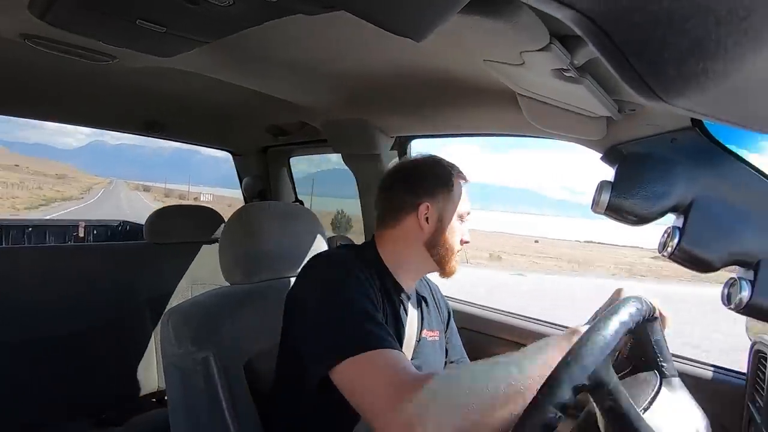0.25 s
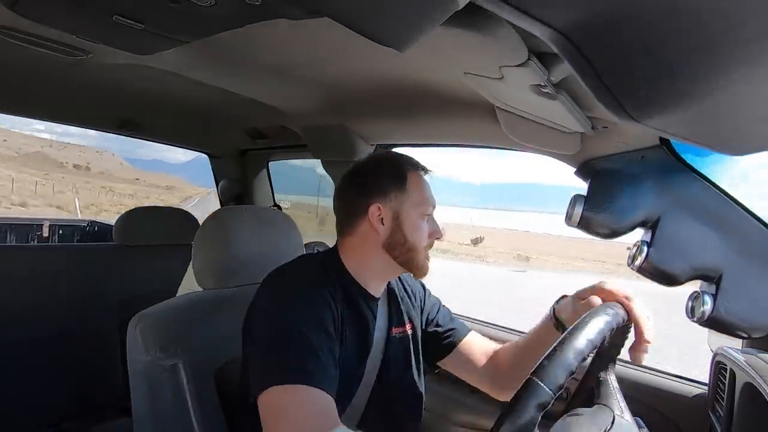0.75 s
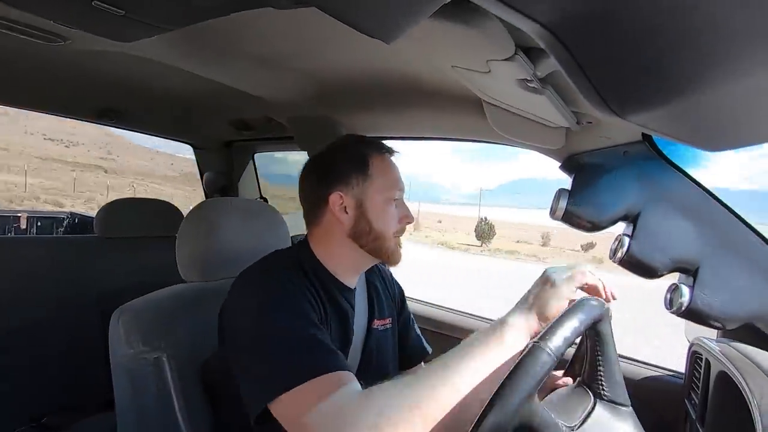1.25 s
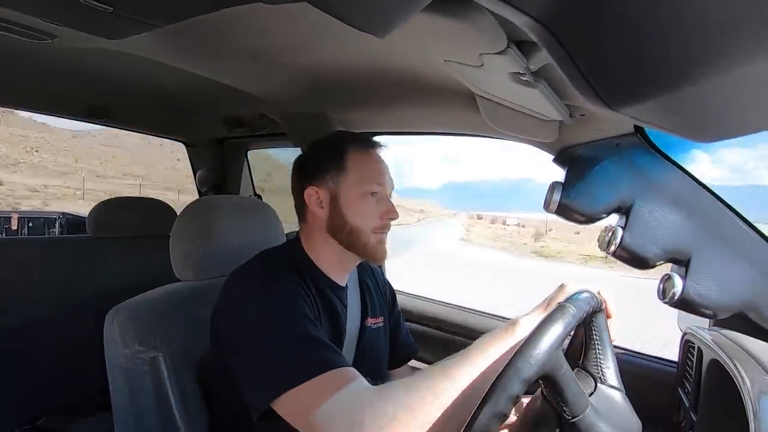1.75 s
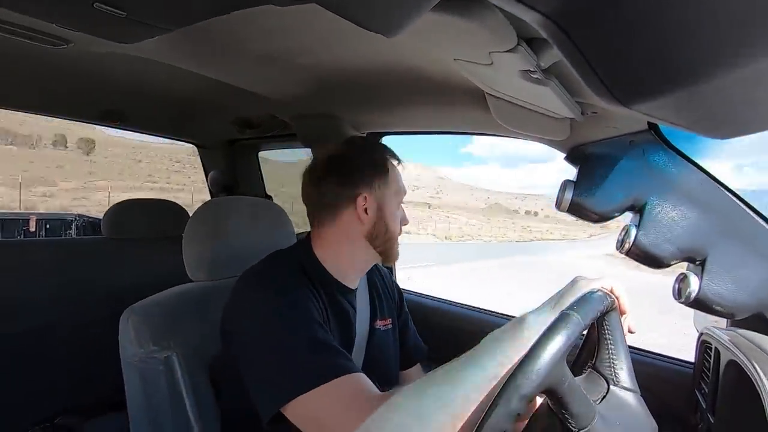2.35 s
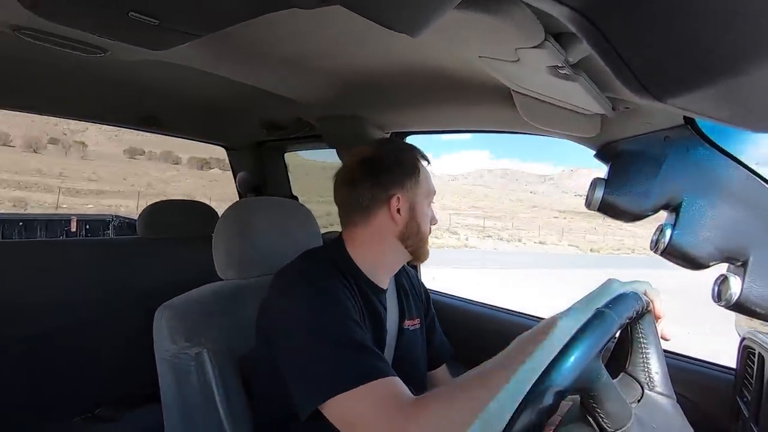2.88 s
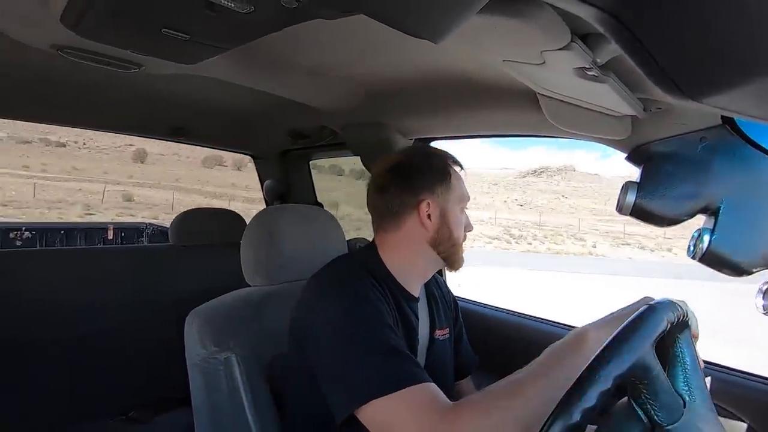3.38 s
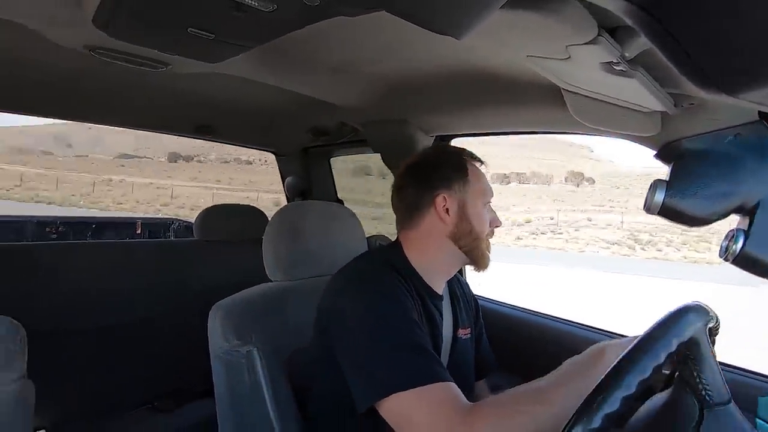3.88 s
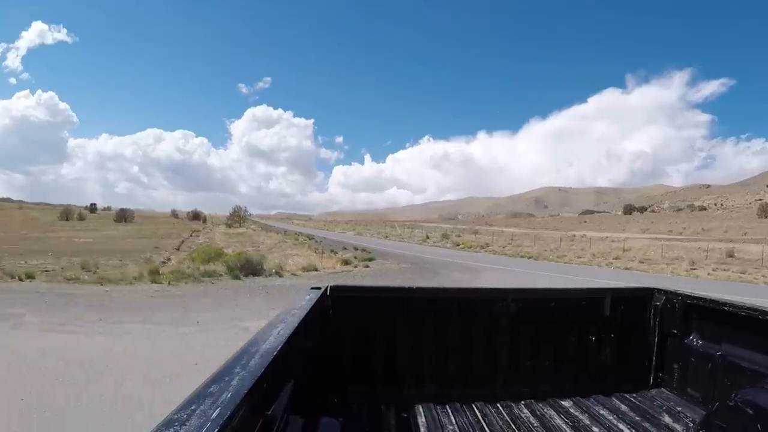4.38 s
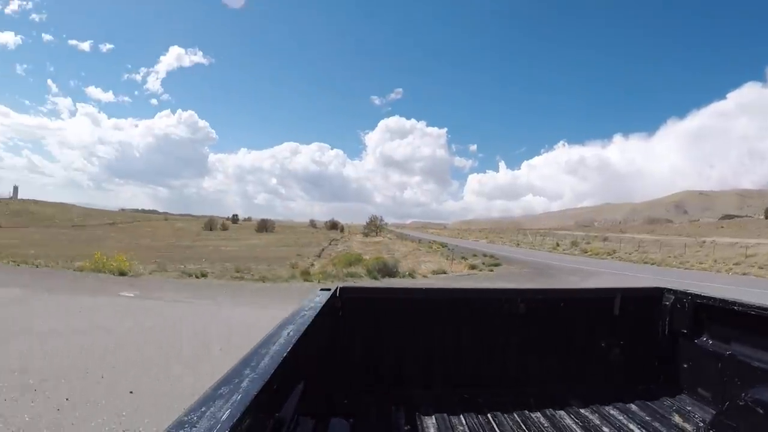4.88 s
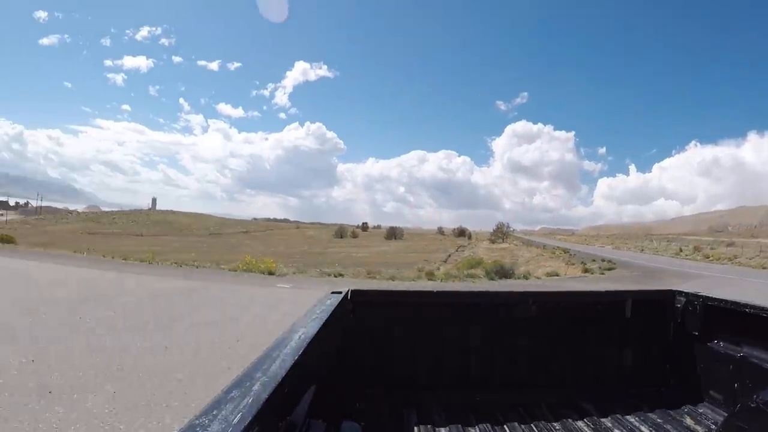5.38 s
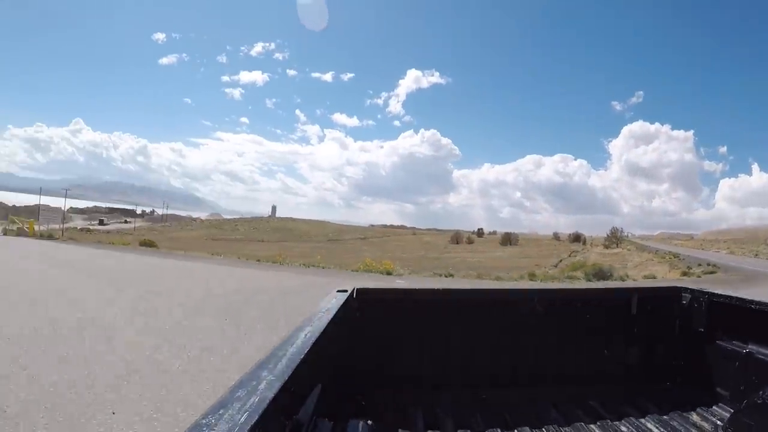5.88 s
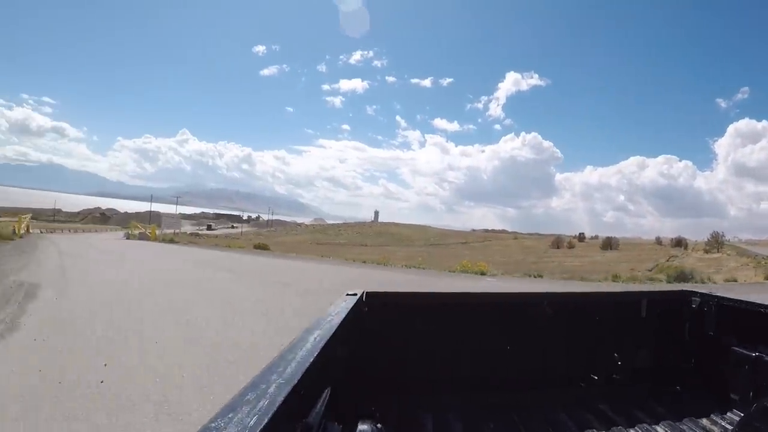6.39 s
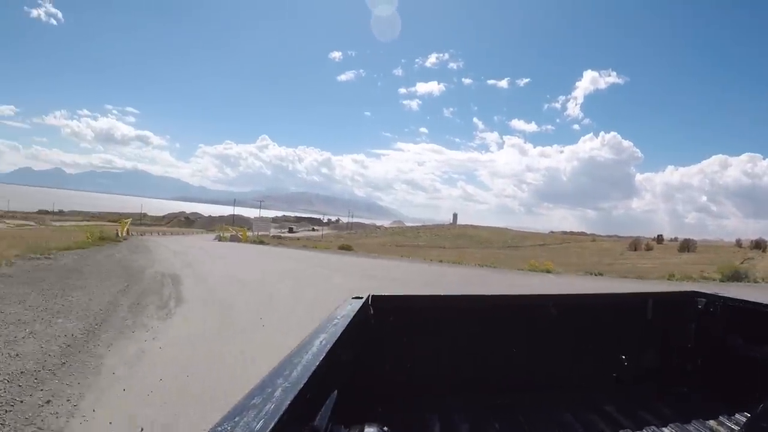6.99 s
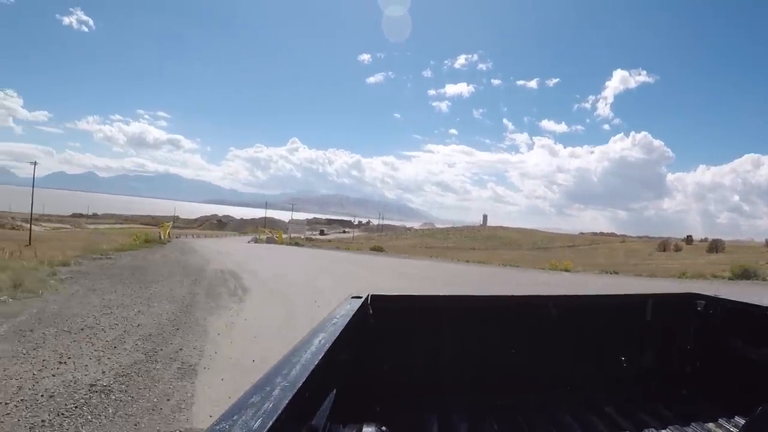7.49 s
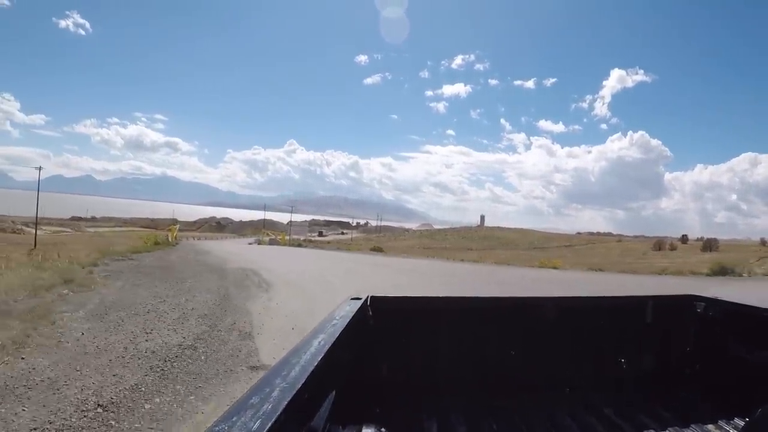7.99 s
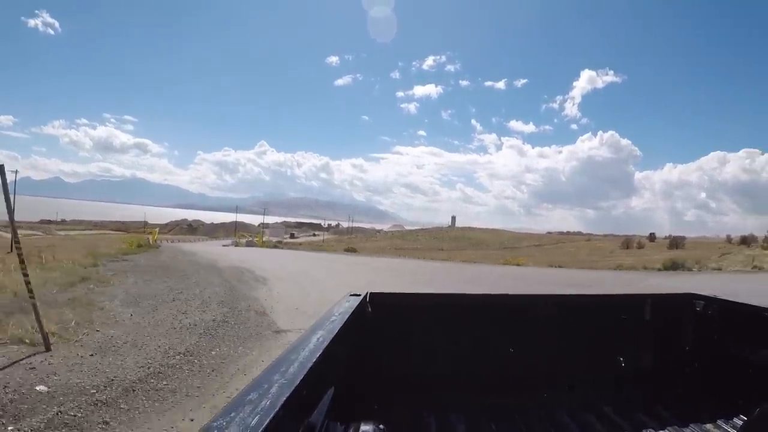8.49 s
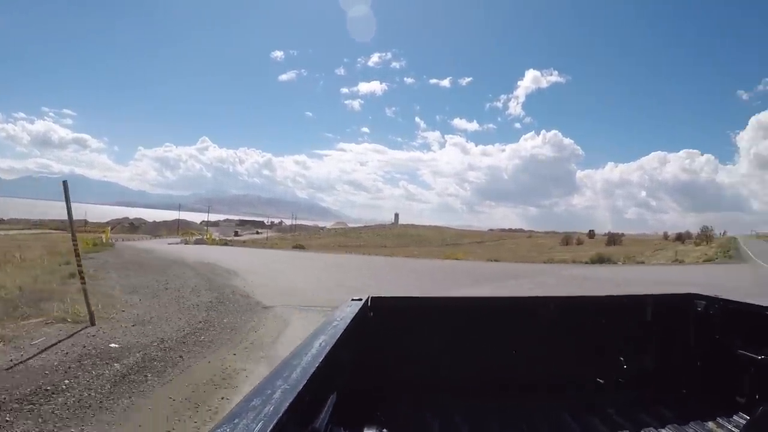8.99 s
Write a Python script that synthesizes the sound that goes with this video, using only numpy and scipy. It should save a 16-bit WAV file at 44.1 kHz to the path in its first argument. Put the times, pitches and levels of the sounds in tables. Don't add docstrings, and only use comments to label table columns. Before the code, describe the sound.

A big truck engine burbles softly in the cab, then suddenly loud outside with rattling steel bed and wind thumps, before revving up and climbing.

```python
import sys
import numpy as np
from scipy import signal
from scipy.fft import rfft, irfft, next_fast_len
from scipy.io import wavfile
from scipy.ndimage import uniform_filter1d

SR = 44100
rng = np.random.default_rng(int(sys.argv[2]) if len(sys.argv) > 2 else 0)


def linear_from_db(decibels):
    return 10 ** (np.asarray(decibels, float) / 20)


def master(y):
    cut = np.clip(np.atleast_2d(y).T, -1, 1)
    pcm = np.round(cut * 32767)
    wavfile.write(sys.argv[1], SR, pcm.astype(np.int16))


N = 407925

# (time [s], full engine cycles [1/s])
WALKING_SPEED = [(0, 6.95), (.95, 7.42), (1.3, 7.0), (1.95, 7.3), (2.55, 7.05), (3, 7.24), (3.3, 6.97),
                 (4, 6.82), (4.5, 7.1), (5.5, 7.15), (6.2, 6.93), (6.95, 7.68), (7.42, 7.9)]
# (time [s], full engine cycles [1/s])
PULLING_SPEED = [(7.56, 9.35), (7.66, 10.7), (7.85, 12.25), (8.0, 13.3), (8.14, 13.6), (8.49, 13.66),
                 (8.62, 14.1), (8.88, 15.65), (9.0, 15.9), (9.18, 16.1), (9.25, 16.5)]
# (time [s], opening [0-1])
THROTTLE = [
    (7.4, 0.11),
    (7.58, 0.4),
    (7.85, 0.83),
    (8.1, 0.4),
    (8.5, 0.5),
    (8.85, 0.3),
    (9.25, 0.8),
]
FIRING_STRENGTH = [1.0, .9, .72, 1.2, 1.05, .95, .85, 1.1]
NEAR_PIPE = [1, 0, 1, 1, 0, 1, 0, 0]
# (time [s], level [dB])
RUSH = [(3.5, -16.5), (3.95, -23.5), (4.2, -18.5), (4.75, -18.5), (5.8, -20), (6.4, -27), (6.65, -26.5),
        (6.85, -21), (7.3, -20), (7.65, -19.5), (8.2, -22.5), (8.9, -22), (9.25, -19)]
# (frequency [Hz], gain [dB])
CAB_PIPE = [(30, -16), (58, -7), (80, 0), (95, -2), (105, -9), (114, -2), (123, 8), (137, -8), (152, -8),
            (170, -18), (270, -28), (284, -23), (300, -32), (500, -60)]
# (frequency [Hz], gain [dB])
BED_PIPE = [(36, -20), (60, -1), (92, 2), (106, -11), (122, 1), (136, -19), (150, -5), (200, -23),
            (258, -13), (310, -28), (378, -19), (450, -34), (538, -18), (620, -45)]
# (frequency [Hz], gain [dB])
LOAD_PIPE = [(40, -23), (54, -3.5), (61, 3), (68, -0.5), (86, -3), (97, -10), (110, -9), (123, 3),
             (137, -10), (149, -2), (162, 0), (182, 0), (215, -15), (244, 2.5), (259, 1.5), (276, -1.5),
             (300, -7.5), (380, -9), (420, -11), (500, -12), (540, -3.5), (600, -23)]
# (frequency [Hz], level [dB per Hz])
HUSH_COLOUR = [(120, 10.5), (170, -13.5), (230, -17.5), (283, -11), (371, -19), (690, -28.5), (1500, -37.5),
               (3500, -48.5), (8000, -54), (12500, -59), (15600, -59), (15800, -95)]
# (frequency [Hz], level [dB per Hz])
RUMBLE_COLOUR = [(12, 0), (30, 0), (45, -8), (65, -15), (130, -13), (170, -19), (300, -30)]
# (frequency [Hz], level [dB per Hz])
BUFFET_COLOUR = [(15, -16), (30, -1), (40, 0), (55, -6), (100, -8), (130, -12), (160, -15), (300, -32)]
# (frequency [Hz], level [dB per Hz])
ROAR_COLOUR = [(110, 1.5), (165, -3.5), (209, -9), (236, -6.5), (258, 0.5), (282, -10), (307, -12),
               (352, -9.5), (376, -3), (398, -10.5), (480, -13.5), (515, -11.5), (536, -6), (560, -11.5),
               (734, -16), (838, -13.5), (1600, -32.5), (2400, -56.5)]
# (frequency [Hz], level [dB per Hz])
HISS_COLOUR = [(800, -70), (1200, 1), (1700, -3.5), (2200, -0.9), (2650, -10), (3300, -10.5), (4700, -16),
               (5300, -18.5), (6300, -19), (7300, -30), (8500, -24), (10500, -29.5), (11800, -39),
               (13500, -44), (14800, -57), (15400, -72)]
# (time [s], peak [dB], top end [dB], low end [dB])
TICKS = [(0.2769, -47, -26.5, -1), (0.346, -42, -7, -7), (0.399, -53, -2, 7), (0.472, -35, -0.5, -8),
         (0.502, -39.5, -11, -5), (.762, -53.5, 1.5, -13), (.79, -51.5, 1, -2.5), (0.817, -39.5, -3.5, -1),
         (0.847, -48, -11.5, -8.5), (0.926, -50, -5, -11), (1.2294, -48, -18.5, -5.5),
         (1.416, -42.5, -19, -5), (1.445, -53, -22, 2), (1.479, -43.5, -21, -2),
         (1.505, -45.5, -18.5, -12.5), (1.5352, -49, -17.5, -1), (1.695, -45, -28, -6), (2.012, -57, 0, 6),
         (2.083, -46.5, -33.5, -14.5), (2.314, -43, -30, -13), (2.9733, -55.5, -28, 9),
         (3.3008, -47, -16, -2)]
# (time [s], peak [dB], pitch [Hz])
RINGS = [
    (.474, -45, 2300),
    (.502, -46, 980),
    (.82, -41, 918),
    (.832, -40, 450),
    (1.418, -52, 2300),
    (1.485, -51, 2400),
    (1.696, -57, 3500),
    (2.085, -50, 3100),
    (2.315, -51, 5000),
    (2.97, -52, 2700),
]
# (time [s], peak [dB], centre [Hz])
KNOCKS = [(3.599, -35, 1520), (3.676, -46, 2150), (3.789, -33, 2140), (4.058, -36, 2000),
          (4.0756, -20, 2220), (4.118, -30, 915), (4.2349, -17.5, 1850), (4.252, -28, 1500),
          (4.327, -25, 1790), (4.345, -21.5, 1040), (4.381, -37, 820), (4.758, -24, 820), (4.824, -27, 835),
          (4.983, -47, 805), (5.706, -27.5, 900), (5.752, -30, 820), (6.941, -37, 845), (7.866, -33, 800),
          (7.96, -35, 900), (8.63, -26, 900), (9.2, -26, 900), (9.187, -22, 600), (4.519, -23, 883),
          (4.551, -24.5, 1910), (4.7106, -25.5, 1230), (4.787, -24, 1150), (5.0573, -29, 1270),
          (5.3887, -31, 1318), (5.8302, -35, 1330), (6.135, -35, 800), (6.2432, -17.5, 690),
          (6.246, -28, 1480), (6.468, -38, 700), (6.48, -36, 1200), (6.7523, -25, 1213),
          (6.9769, -24, 1160), (7.2269, -20.5, 1860), (7.6184, -25, 1420), (8.0232, -21, 1148),
          (8.0632, -22.5, 2115), (8.431, -30, 1250), (8.757, -24, 586), (8.9292, -21.5, 1246),
          (8.9498, -23, 1590), (9.043, -24, 1220), (9.107, -14.5, 840), (9.168, -28, 550),
          (9.185, -21.5, 1210)]
# (frequency [Hz], width [Hz], level [dB])
STEEL = [(590, 70, -3), (835, 60, -3), (1000, 90, -5), (1240, 70, 0), (1500, 120, -4), (1830, 90, 0),
         (2200, 110, -2), (2650, 250, -8), (3250, 400, -10), (4800, 900, -12)]
# (time [s], peak [dB], lower ring [dB])
RATTLES = [(3.6625, -56.5, 2), (3.7751, -57.5, 19), (3.9059, -53.5, 12), (4.0695, -50.5, 17),
           (4.126, -49, -11), (4.4548, -55.5, 12), (4.515, -51, 14), (4.57, -52, 15), (4.617, -49, 16),
           (4.826, -47, 17), (5.059, -49, 18.5), (5.3911, -47.5, 9.5), (5.497, -55, -23),
           (5.5662, -46.5, -11), (5.683, -43.5, 11.5), (5.8197, -51, 13), (6.2436, -69, 29.5),
           (6.293, -51.5, 19.5), (6.833, -56.5, 17), (7.218, -69, 22), (7.428, -49.5, 13),
           (7.5982, -65, 4.5), (7.6226, -50.5, 9), (7.7235, -54.5, -4.5), (7.8988, -52, 14),
           (7.9257, -61, 6), (8.1207, -48.5, 16.5), (8.614, -60, 4), (8.9471, -62, 27.5), (9.122, -77, 35),
           (4.234, -60.5, 27.5), (4.28, -62.5, 21.5), (4.33, -62, 27), (4.711, -62.5, 26.5),
           (4.912, -61.5, 20), (4.978, -69, 13), (5.304, -66, 16), (5.963, -65.5, 21.5), (6.002, -60, 23.5),
           (6.057, -69, 26), (6.164, -66, 22), (6.378, -66.5, 22), (6.48, -69, 24), (6.9765, -70.5, 26),
           (7.283, -68.5, 24.5), (7.845, -63, 25), (8.059, -66.5, 28), (8.211, -66, 20.5),
           (8.545, -65.5, 28), (8.924, -69.5, 30)]
# (time [s], peak [dB])
GUSTS = [(5.651, -22), (6.045, -12), (6.076, -12), (6.124, 0), (6.194, -6), (6.241, -4), (6.33, -9),
         (6.41, -9.5), (6.471, -12.5), (6.537, -15), (6.584, -10.5), (7.36, -13)]
# (multiple of the cycle rate [1], in the cab [dB rms], over the bed [dB rms])
IDLE_TONES = [(13, -35, -25), (15, -43, -32), (17, -38.5, -30), (18, -49.5, -37.5), (19, -60.5, -49.5),
              (21, -50.5, -38), (24, -47.5, -44), (27, -58.5, -43), (36, -64, -39.5), (37, -61, -39),
              (38, -64.5, -39.5), (39, -62, -45)]
LOAD_ORDERS = [5, 6, 7, 8, 9, 10, 11, 12, 13]
LOAD_ORDERS_DB = [-14.5, -33.5, -25, -20, -34, -26.5, -26.5, -32.5, -30]
HIGH_ORDERS_DB = [-36.5, -34.5, -35, -27.5, -33, -39, -30, -27.5, -36, -30.5, -31.5, -34, -35, -31.5, -27.5,
                  -34, -41, -38, -39, -31.5, -32.5, -44, -31.5, -36, -42, -33.5, -34, -25, -40, -30, -29.5]

HIGH_ORDERS = range(14, 45)
FADE_S = (3.48, 4.0)
CLEAN_THROTTLE = 0.42
TICK_T60_S = 0.11


def rms_one(x):
    return x / np.sqrt(np.mean(x ** 2) + 1e-20)


def seconds():
    return np.arange(N) / SR


def in_time(rows):
    s, *columns = np.transpose(rows)
    return [np.interp(seconds(), s, column) for column in columns]


def drift(rate):
    step = 40
    r = np.exp(-2 * np.pi * step * rate / SR)
    white = rng.standard_normal(N // step + 2002)
    slow = signal.lfilter([1], [1, -2 * r, r * r], white)[2000:]
    return np.interp(np.arange(N) / step, np.arange(len(slow)), rms_one(slow))


def resonate(x, modes):
    out = 0
    for hz, width, level_db in modes:
        r = np.exp(-np.pi * abs(width) / SR)
        top = [(1 - r * r) / 2, 0, (r * r - 1) / 2]
        out = out + linear_from_db(level_db) * signal.lfilter(top, [1, -2 * r * np.cos(2 * np.pi * hz / SR), r * r], x)
    return out


def band(x, low_hz, high_hz):
    edges = [low_hz, min(high_hz, .45 * SR)]
    return signal.sosfilt(signal.butter(2, edges, "band", fs=SR, output="sos"), x)


def noise(colour, patchy_db, rate):
    size = next_fast_len(N)
    hz = np.fft.rfftfreq(size, 1 / SR) + 1e-3
    at, level_db = np.transpose(colour)
    gain = linear_from_db(np.interp(np.log(hz), np.log(at), level_db, left=-90, right=-90))
    spectrum = rfft(rng.standard_normal(size)) * gain
    out, together = 0, drift(rate)
    for centre in np.arange(np.floor(np.log2(at[0])), np.log2(at[-1]) + 1):
        share = np.clip(1 - abs(np.log2(hz) - centre), 0, 1)
        flicker = linear_from_db(patchy_db * (together + 0.62 * drift(rate)))
        out = out + irfft(spectrum * share, size)[:N] * flicker
    return rms_one(out)


def bursts(times, peaks_db, t60s, rise_s):
    out = np.zeros(N)
    t60s = np.clip(np.broadcast_to(t60s, len(times)), .01, .5)
    for s, peak_db, t60 in zip(times, peaks_db, t60s):
        start = int(s * SR)
        t = np.arange(min(int(t60 * SR), N - start)) / SR
        out[start:][:len(t)] += linear_from_db(peak_db - 60 * t / t60) * np.minimum(t / rise_s, 1)
    return out


def cab_hush():
    level_db = -51.5 - 0.5 * seconds() + 13.5
    return linear_from_db(level_db) * noise(HUSH_COLOUR, patchy_db=.6, rate=12.0)


def cab_rumble():
    return linear_from_db(-30.5) * noise(RUMBLE_COLOUR, patchy_db=1.2, rate=6.0)


def squall(lag_s):
    middle_s, length_s = 6.25, 0.24
    return np.exp(-((seconds() - middle_s - lag_s) / length_s) ** 2)


def wind_buffet(throttle, swing_db):
    level_db = -25.5 + throttle + 0.3 * swing_db + 0.68 * 5 * squall(0)
    return linear_from_db(level_db + 1.8) * noise(BUFFET_COLOUR, patchy_db=.9, rate=8.0)


def tyre_roar(throttle, rush_db):
    level_db = rush_db + 5 * squall(0) - 5.5 + 2 * throttle
    return linear_from_db(level_db) * noise(ROAR_COLOUR, patchy_db=1.46, rate=15.3)


def air_hiss(throttle, swing_db):
    level_db = -44 + 0.31 * swing_db + 6.5 * throttle - 0.54 * (seconds() - FADE_S[1])
    return linear_from_db(level_db + 0.5) * noise(HISS_COLOUR, patchy_db=1.0, rate=14.4)


def gusts():
    s, peak_db = np.transpose(GUSTS)
    white = rng.standard_normal((2, N))
    lumps = signal.lfilter([1], [1, -.95], band(white[0], 95, 750))
    flutter = linear_from_db(-22.5) * squall(lag_s=0.21) * rms_one(band(white[1], 128, 260))
    return rms_one(lumps) * bursts(s, peak_db - 8.5, 0.12, rise_s=0.004) + flutter


def trim_ticks():
    s, peak_db, top_db, low_db = np.transpose(TICKS)
    white = rng.standard_normal((3, N))
    middle = rms_one(band(white[0], 1000, 5200)) * bursts(s, peak_db - 17, TICK_T60_S, .00065)
    top = rms_one(band(white[1], 5500, 13000)) * bursts(s, peak_db + top_db - 13, .79 * TICK_T60_S, .0012)
    low = rms_one(band(white[2], 480, 1340)) * bursts(s, peak_db + low_db - 4.5, 1.03 * TICK_T60_S, .0025)
    return middle + top + low


def trim_rings():
    cycles = 9.8
    out = np.zeros(N)
    white = rng.standard_normal((len(RINGS), SR // 10))
    for (s, peak_db, hz), shake in zip(RINGS, white):
        shake = shake * linear_from_db(-60 * np.arange(len(shake)) / SR / TICK_T60_S)
        rung = resonate(shake, [(hz, hz / cycles, peak_db - 10.5)])
        out[int(s * SR):][:len(rung)] += rung * np.sqrt(SR * cycles / np.pi / hz)
    return out


def rattles():
    s, peak_db, lower_db = np.transpose(RATTLES)
    t60_s = .17
    white = rng.standard_normal((2, N)) * linear_from_db(1.2 * drift(150.0))
    bright = band(band(white[0], 10500, 14800), 8000, 14800)
    top = rms_one(bright) * bursts(s, peak_db - 7, .7 * t60_s, .002)
    lower = rms_one(band(white[1], 2800, 7400)) * bursts(s, peak_db + lower_db - 11.5, t60_s, .0023)
    return top + lower


def knocks():
    s, peak_db, centre_hz = np.transpose(KNOCKS)
    t60 = .13 + .004 * (peak_db + 22)
    out, white = 0, rng.standard_normal(N)
    white[(s * SR).astype(int) + 12] = 18.0
    for k, (hz, width, level_db) in enumerate(STEEL):
        tilt_db = -7.0 * abs(np.log2(hz / centre_hz))
        shake = white * bursts(s, peak_db + tilt_db - 11.5, t60, rise_s=3e-4)
        rung = resonate(shake + 1e-18, [(hz, width, level_db)])
        out = out + (-1) ** k * rung * np.sqrt(SR / np.pi / width)
    return signal.sosfilt(signal.butter(3, 3000, fs=SR, output="sos"), out)


def engine_speed():
    return in_time(WALKING_SPEED + PULLING_SPEED)[0]


def engine_load():
    return np.minimum(in_time(THROTTLE)[0] / CLEAN_THROTTLE, 1)


def firings():
    uneven_db, jitter_s = .8, .0002
    turns = np.cumsum(engine_speed()) * 8 / SR
    at = np.flatnonzero(np.diff(np.floor(turns)))
    throttle = in_time(THROTTLE)[0][at]
    chance = rng.standard_normal((len(at), 2))
    scatter = jitter_s * (1 + 1.6 * throttle) * SR * chance[:, 0]
    late = np.clip(at + scatter.astype(int), 0, N - 1)
    far = np.interp(at / SR, FADE_S, [0, -.06]) - .85 * throttle ** 2
    side = np.where(np.resize(NEAR_PIPE, len(at)), 1, far)
    clicks = np.zeros(N)
    clicks[late] = side * np.resize(FIRING_STRENGTH, len(at)) * linear_from_db(uneven_db * chance[:, 1])
    return clicks


def gas_puffs(clicks):
    rise_s = .002
    puff = signal.lfilter([1], [1, -linear_from_db(-60 / (.07 * SR))], abs(clicks))
    puff = signal.fftconvolve(puff, np.hanning(int(2 * rise_s * SR)) / (rise_s * SR))[:N]
    return rms_one(1 + 0.43 * puff)


def exhaust(clicks, pipe, smear_s):
    size = next_fast_len(N + SR)
    hz = np.fft.rfftfreq(size, 1 / SR) + 1e-3
    at, level_db = np.transpose(pipe)
    passed = linear_from_db(np.interp(np.log(hz), np.log(at), level_db, left=-60, right=-120))
    low = np.minimum(hz, 130)
    delay = np.exp(-1j * np.pi * smear_s * low * (2 * hz - low) / 100)
    boom = irfft(rfft(clicks, size) * passed * delay, size)[:N]
    return boom / np.sqrt(uniform_filter1d(boom ** 2, size=SR // 2) + 1e-20)


def idle_tones(outside):
    speed = engine_speed()
    turns = np.cumsum(speed) / SR
    sink_db = 21 * np.clip(speed - 7.15, 0, 1)
    out = 0
    for order, cab_db, bed_db in IDLE_TONES:
        level = (1 - outside) * linear_from_db(cab_db) + outside * linear_from_db(bed_db - sink_db * (order > 30))
        level = level * linear_from_db(1.87 * drift(1.55))
        phase = round(order) * turns + rng.random() + .12 * drift(.5)
        out = out + level * np.sin(2 * np.pi * phase)
    return np.sqrt(2) * (1 - engine_load()) * out


def load_tones():
    first = int(THROTTLE[0][0] * SR) - SR // 10
    speed = engine_speed()[first:]
    turns = np.cumsum(speed) / SR
    steps = np.arange(len(speed)) / SR / 0.0904
    at, pipe_db = np.transpose(LOAD_PIPE)
    out = np.zeros(N)
    orders = list(LOAD_ORDERS) + list(HIGH_ORDERS)
    levels_db = list(LOAD_ORDERS_DB) + list(HIGH_ORDERS_DB)
    for order, level_db in zip(orders, levels_db):
        waver_db = np.interp(steps, np.arange(40), rng.standard_normal(40))
        waver_db = (1 + order / 20) * waver_db
        passed_db = np.interp(np.log(order * speed), np.log(at), pipe_db, right=-40)
        sink_db = 0.95 * (speed - 11) * (order in HIGH_ORDERS)
        level = linear_from_db(level_db + passed_db + waver_db - sink_db)
        out[first:] += level * np.sin(2 * np.pi * (order * turns + rng.random()))
    return np.sqrt(2) * out


def open_exhaust(clicks, throttle):
    idle_pipe = [(hz, db - 3 * (hz > 130)) for hz, db in BED_PIPE]
    load = engine_load()
    level = linear_from_db(-17.6 - 0.5 + 5.2 * throttle)
    return level * (1 - load) * exhaust(clicks, idle_pipe, smear_s=.05) + linear_from_db(0.5) * load * load_tones()


def cab(clicks):
    boom = linear_from_db(-31) * exhaust(clicks, CAB_PIPE, smear_s=.06)
    return cab_hush() + cab_rumble() + trim_ticks() + trim_rings() + boom


def bed(clicks, outside):
    throttle, = in_time(THROTTLE)
    rush_db, = in_time(RUSH)
    swing_db = rush_db + 23
    puffs = gas_puffs(clicks)
    low = wind_buffet(throttle, swing_db) + puffs * tyre_roar(throttle, rush_db)
    low = low + open_exhaust(clicks, throttle)
    hiss = puffs * air_hiss(throttle, swing_db)
    return outside ** 1.15 * low + outside ** .8 * hiss


def scene():
    clicks = firings()
    outside = np.interp(seconds(), FADE_S, [0, 1])
    places = (1 - outside) * cab(clicks) + bed(clicks, outside)
    return (places + gusts() + rattles() + knocks() + idle_tones(outside))[None]


def band_limit(x):
    return signal.sosfilt(signal.butter(12, 15700, fs=SR, output="sos"), x)


def record(dry):
    mix = 0.82 * np.tanh(dry / 0.78)
    return band_limit(mix)


dry = scene()
out = record(dry)
master(out)
```